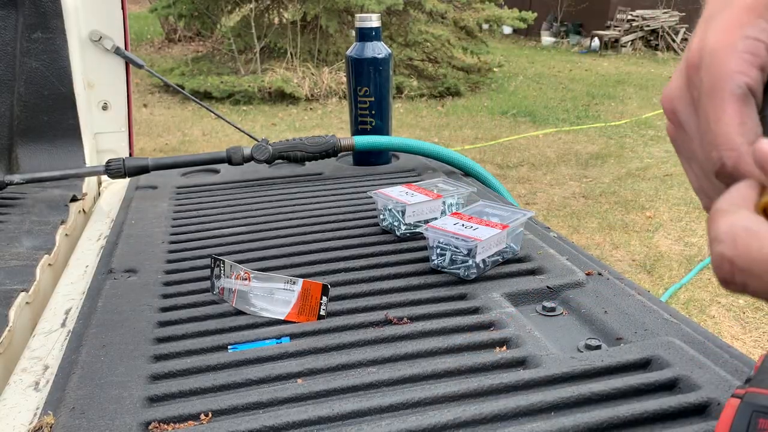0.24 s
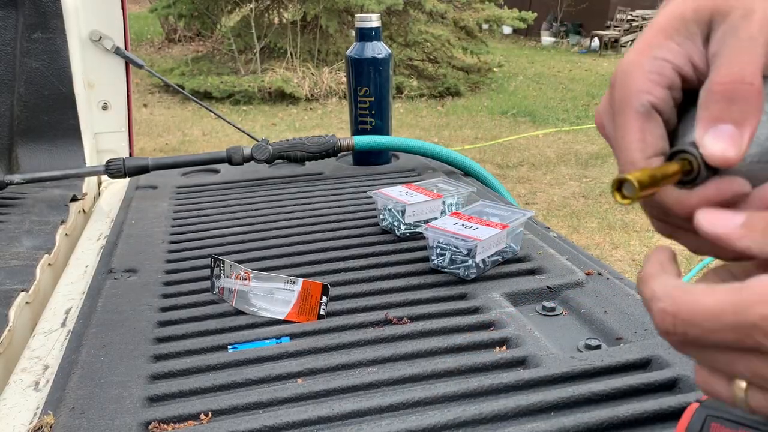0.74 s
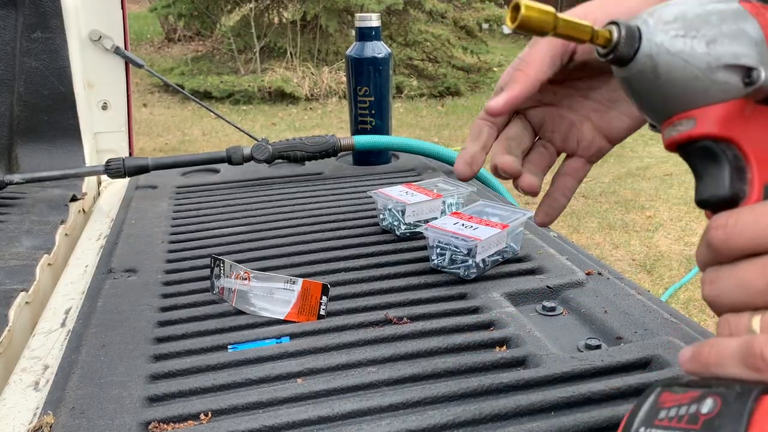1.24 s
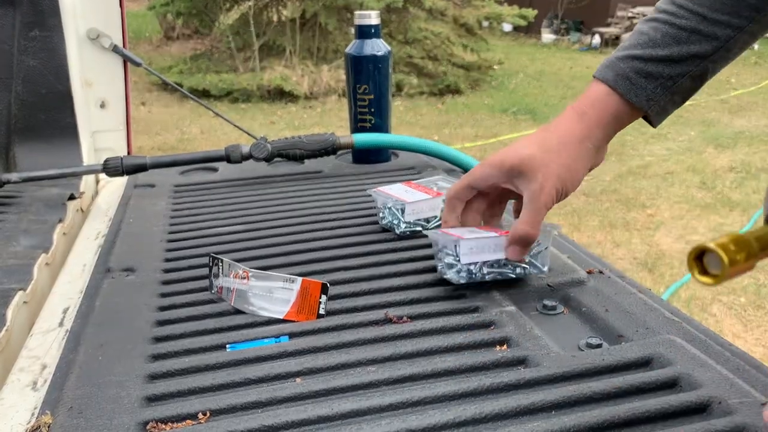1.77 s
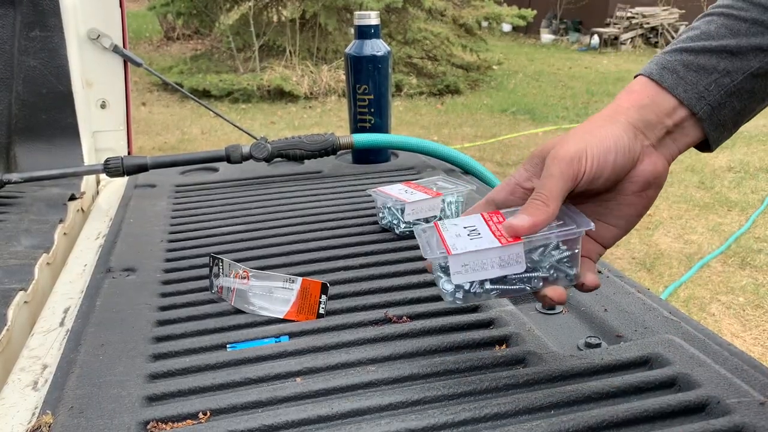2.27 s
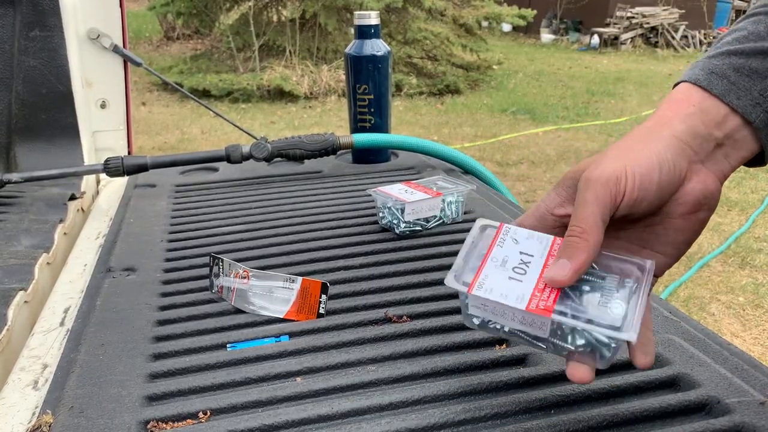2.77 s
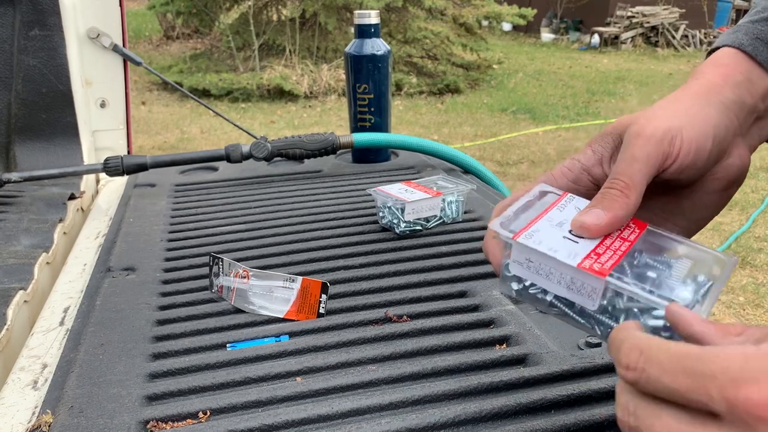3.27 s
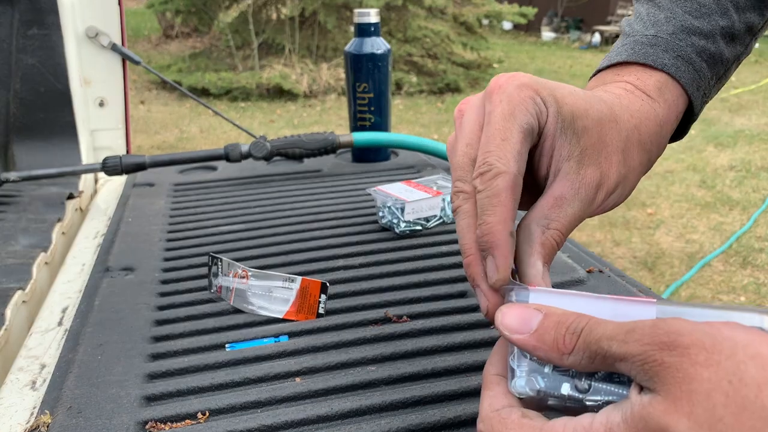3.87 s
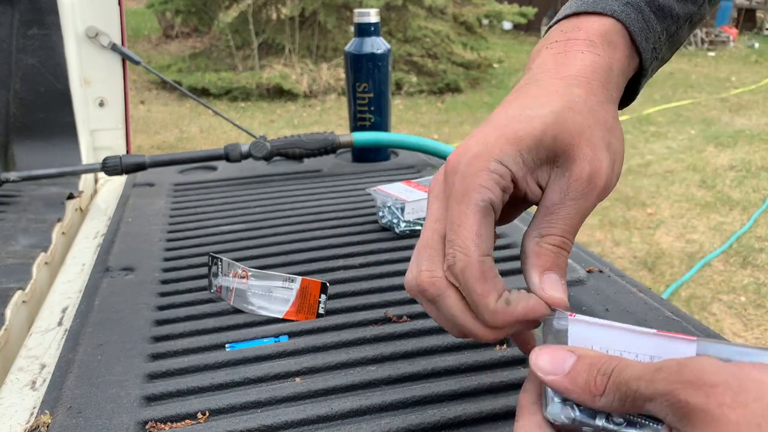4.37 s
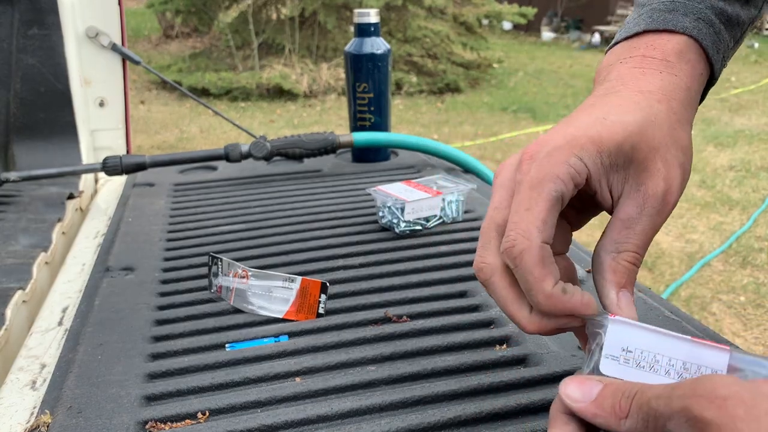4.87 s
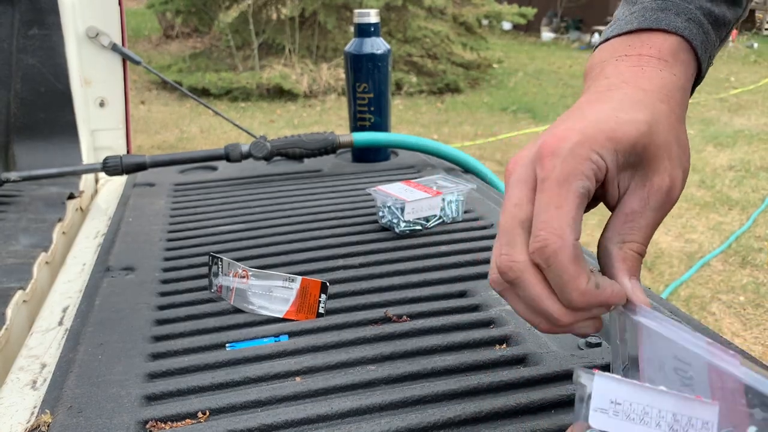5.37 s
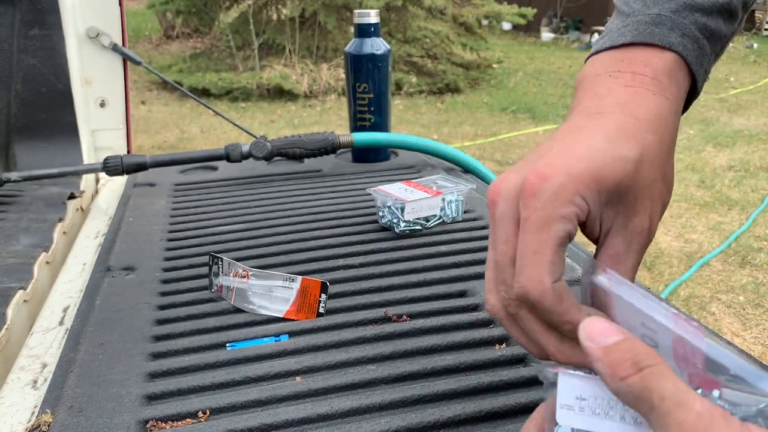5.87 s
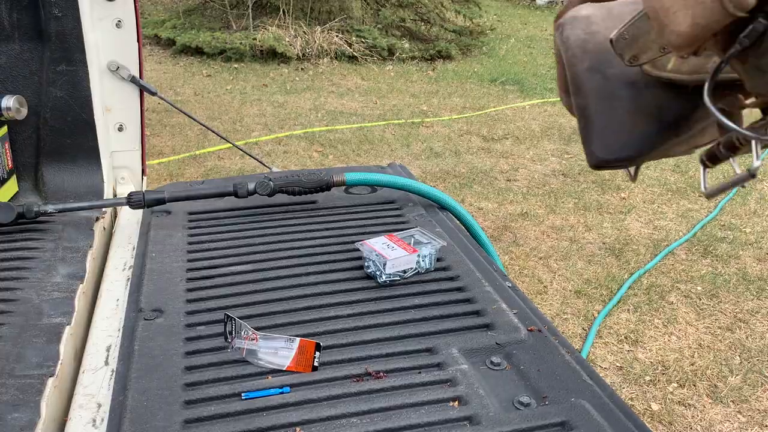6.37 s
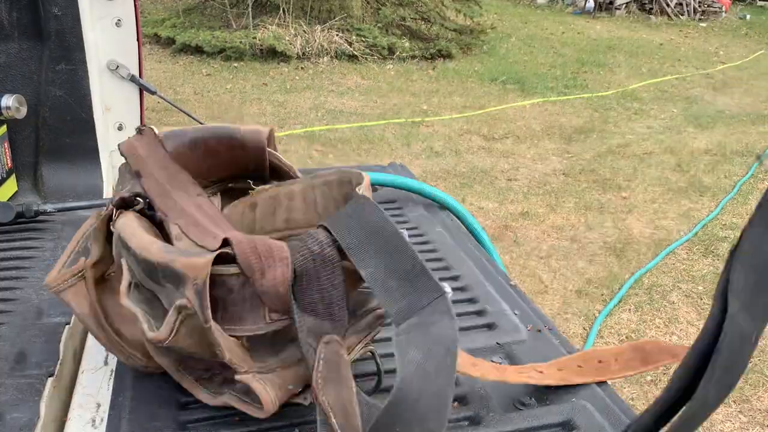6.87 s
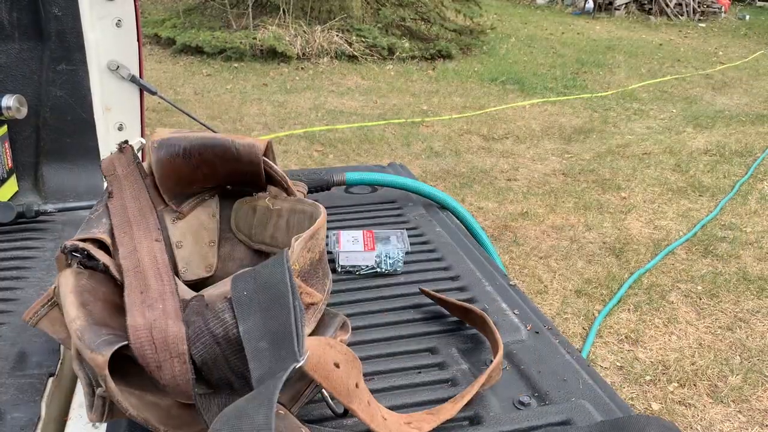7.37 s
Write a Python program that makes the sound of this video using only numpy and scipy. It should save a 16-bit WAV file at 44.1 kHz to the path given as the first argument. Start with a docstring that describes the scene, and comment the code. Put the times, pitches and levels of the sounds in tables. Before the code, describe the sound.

Close outdoor handling: sharp metallic clicks, a hollow knock, rattling screws, snapping plastic lid, and finally a heavy belt landing with clattering buckles.

```python
"""A bit clicks into a driver's chuck, close by, outdoors at a truck's tailgate. A plastic box of screws is then lifted,
tilted and picked open; last, a leather tool belt drops on the ribbed liner and its buckles jingle.
Blows are noise cracks with damped modes; buckles and collar are decaying sines, thumps are falling tones.
Sliding screws and leather are dense random contacts that also shake hollow bodies. Wind and far traffic are
shaped noise, rumbling below."""
import sys
import numpy as np
from scipy import signal
from scipy.fft import rfft, irfft, next_fast_len
from scipy.io import wavfile
from scipy.ndimage import uniform_filter1d

SR = 44100
rng = np.random.default_rng(int(sys.argv[2]) if len(sys.argv) > 2 else 0)


def digitize_waveform(pressure):
    """Quantize a signal to 16-bit integers and store it at the path in sys.argv[1].

    Rows of a 2-D input are taken as channels; values are limited to [-1, 1].
    """
    field = np.atleast_2d(pressure).T
    bounded = np.clip(field, -1, 1)
    quanta = np.round(bounded * 32767).astype(np.int16)
    wavfile.write(sys.argv[1], SR, quanta)


def invert_db(x):
    """Field ratio 10**(x/20) for x, a level in decibels (scalar or array-like)."""
    u = np.asarray(x, float) / 20
    return 10 ** u


N = 335601
T = np.arange(N) / SR

# Rumble of wind and traffic, swelling where the tailgate booms: [t/s, mean level/dB]
RUMBLE_LEVEL = [(0, -45), (1.0, -46), (1.035, -52.5), (1.55, -48), (1.66, -28), (1.8, -40.5), (3.2, -50),
                (6.45, -55), (6.58, -35.5), (7.0, -37), (7.6, -64)]
# Spectral density of the rumble: [f/Hz, level/dB per Hz]
RUMBLE_COLOUR = [(20, -34.5), (66, -2.5), (160, -16), (200, -13), (260, -29.5), (1340, -44.5), (8000, -83),
                 (17600, -120)]
# Spectral density of grit and ticking screws: [f/Hz, level/dB per Hz]
GRIT_COLOUR = [(1300, -2.5), (2100, 1.5), (4000, -7.5), (7000, -17), (17000, -31)]

# Changing level of handling noise, with sudden drops: [t/s, grit level/dB, body level/dB]
HANDLING = [(0, -72.5, -66.5), (1.031, -74.5, -64), (1.07, -80.5, -71), (1.48, -72.5, -65.5),
            (1.9, -63.5, -60.5), (2.45, -58.5, -51), (3.2, -67, -63), (4.2, -62, -60), (4.5, -62.5, -58),
            (5.398, -47.5, -56), (5.6, -75, -57.5), (6.121, -52, -100.5), (6.168, -93.5, -68.5),
            (6.28, -56, -57.5), (7.0, -65.5, -50), (7.37, -108, -77.5), (7.61, -64, -79)]
# Knocks that shake loose parts, rising suddenly and then settling:
# [peak t/s, grit level/dB, treble over grit/dB, low body over grit/dB, time to fade by 20 dB/s]
JOLTS = [(0.444, -47, 1, 6.5, 0.1), (1.524, -44.5, -5, 8, 0.43), (1.638, -37.5, -2.5, 17, 0.0577),
         (3.426, -47.5, -0.5, -3.5, 0.2), (4.293, -40.5, 1.5, -14, 0.15), (4.549, -32, -2.5, -10, 0.09),
         (5.243, -27, -1, -11, 0.0371), (6.524, -45, -2.5, 15, 0.57), (6.571, -17.5, 1.5, 9.5, 0.1012),
         (7.064, -53.5, -17, 24, 0.05)]
# Screws or leather sliding, an even swell and fade:
# [peak t/s, grit level/dB, treble over grit/dB, low body over grit/dB, time to rise or fade by 20 dB/s]
SLIDES = [(0.09, -57.5, -16, -24, 0.13), (0.89, -62.5, 13.5, -15, 0.048), (0.99, -56, 8, -5, 0.07),
          (1.721, -39, -4.5, -3, 0.069), (2.106, -29, 0, -1, 0.096), (2.80, -54.5, 7.5, 0, 0.23),
          (2.978, -44, -5.5, -8.5, 0.13), (3.73, -55, 3, -6, 0.21), (4.183, -50, 5.5, -17, 0.064),
          (4.35, -57.5, -2, 20.5, 0.09), (5.49, -42.5, -1, -11, 0.075), (5.827, -37, -4, -17, 0.26),
          (6.436, -47.5, 8, -34, 0.11), (6.751, -48.5, 1, 13.5, 0.21), (6.916, -34, -2, 16, 0.12)]
# The lid tearing open in one crunch:
# [grit level at start/dB, at end/dB, treble over grit/dB, low body over grit/dB, high body over grit/dB]
LID_TEAR = (-23, -31, -4, -6, 2)
# Duration of the tear: [start t/s, end t/s]
LID_TEAR_S = (6.084, 6.14)
# While the box is held off the liner: [start t/s, end t/s]
IN_HAND_S = (2.8, 6.2)

# Dull thumps of hand, tool or box: [t/s, level/dB, start f/Hz, t60/s]
THUMPS = [(0.404, -26, 698, 0.084), (0.439, -24, 222.5, 0.1), (0.99, -23, 420, 0.055),
          (0.993, -24.5, 221, 0.087), (1.613, -11, 523, 0.074), (1.784, -30.5, 532, 0.37),
          (2.41, -30.5, 498, 0.24), (5.25, -22, 483, 0.076), (6.114, -22.5, 480, 0.067),
          (7.192, -30, 461, 0.38)]
# The chuck's collar springing shut: [t/s, level/dB, f/Hz, t60/s]
COLLAR = (.988, -11, 15300, .016)
# Buckle parts touching: [t/s, level of small parts/dB, level of large ring/dB]
JINGLE = [(6.382, -20, -39.5), (6.408, -19.5, -54), (6.429, -21.5, -46), (6.513, -17.5, -42),
          (6.6675, -32, -42.5), (6.706, -28, -48), (6.7218, -28.5, -32), (6.75, -23.5, -41.5),
          (6.781, -24.5, -40.5), (6.847, -25, -37.5), (6.9687, -31, -48.5)]

# Blows: [t/s, crack level/dB, treble over crack/dB, low ring over crack/dB, high ring over crack/dB]
# Bit entering the chuck
CHUCK_BLOWS = [(0.16, -32, -8, -17, -7), (0.314, -38.5, -17, -9, 8), (0.405, -42, 0, 4, 5),
               (0.4326, -24.5, -16, 2, -17.5), (0.4526, -7.5, 2.5, -22, -8), (0.579, -48, -5, -15, -3),
               (0.6698, -44.5, -7, -7, 3), (0.9867, -19.5, 6, -3, -1.5)]
# Box knocking the liner as it is lifted, same columns
LIFT_BLOWS = [(1.517, -19, -8.5, -8, 4.5), (1.6096, -21, -4, 16, 8.5), (1.6205, -20, -23, 16.5, -13),
              (1.7112, -21.5, -21, -28, 5), (1.7839, -44, -8, 25.5, 18), (1.9236, -26, -11, 7, 6),
              (2.0804, -15, -0.5, -30, -9), (2.12, -25.5, -5, -13, -9), (2.2777, -36.5, -3, 6, 7),
              (2.4125, -56.5, -31, 29.5, 19), (2.655, -39.5, -18, -12, 5), (2.7376, -30, -6.5, 1, 6)]
# Box handled and its lid picked open, same columns
BOX_BLOWS = [(3.4171, -28.5, 6.5, -1, -35), (3.7383, -22.5, -3.5, -20, -15), (3.9664, -10.5, 7.5, -15, -48),
             (4.1515, -33.5, 7.5, -33, -20), (4.2879, -4, 3.5, -19.5, -10.5), (4.3841, -9, 1, -0.5, -2.5),
             (4.4348, -13.5, -9, -11, -8), (4.5284, -27.5, -1.5, 3, 4.5), (4.5602, -13.5, 8.5, -15, -15),
             (4.6542, -8.5, -2, -17, -20), (4.7147, -31, -1, -6, -6), (4.794, -27, -1, -4, -4),
             (4.8913, -24.5, -10, -2, -6.5), (4.9587, -17.5, -1, -6.5, -10.5), (5.0078, -28.5, 6, -3.5, -3),
             (5.051, -33.5, -8, -4, -7), (5.0935, -12, 11, -15, -44), (5.1427, -30, 2.5, 0, -4),
             (5.1811, -21.5, -1, -8, -10), (5.1918, -22.5, 13.5, -15, -16), (5.2123, -20.5, 5, -28, -30.5),
             (5.226, -11, 12.5, -18, -3.5), (5.2375, -15.5, 3.5, -25.5, -18.5), (5.2475, -3, 3, -20, -5),
             (5.3519, -28, -4.5, 6.5, 1), (5.3904, -20.5, 11, -37, -2), (5.654, -34, 14.5, -9, 0.5),
             (5.708, -35, 9, -17, 7), (5.739, -35.5, 8, -6, 9.5), (5.8242, -4, -11.5, -39, -16),
             (5.9512, -20, 10, -30, -5.5), (6.0376, -31.5, 11.5, -13, -0.5), (6.0834, -5, 3.5, -41, -2.5),
             (6.1011, -11, 9, -19.5, 0.5), (6.112, -2.5, 4.5, -13.5, -0.5)]
# Tool belt landing, same columns
BELT_BLOWS = [(6.5033, -32, -4, 22.4, 8), (6.5434, -6, -11, 4.8, 7.5), (6.7057, -22.5, -3.5, 13.2, 8),
              (6.7771, -24.5, 1, 12.7, 14.5), (6.8269, -25, -3.5, 12, 12.5), (6.8488, -16.5, -1.5, 10, 7.5),
              (6.8952, -3.5, -7.5, 5.4, 1), (6.936, -28.5, -39, 24, 11), (6.9854, -38, -5.5, 25.4, 18),
              (7.055, -24, -10.5, 11.9, 8.5), (7.163, -35.5, -9.5, 11, 7.5), (7.22, -50, -48.5, 32, 21),
              (7.3103, -60.5, -49, 37, 22.5)]
# Faint single clicks, mostly of screws and box, one as the belt settles: [t/s, crack level/dB]
CLICKS = [(2.5138, -41), (2.574, -50), (2.6236, -43), (2.6783, -40), (2.7741, -42), (2.9282, -35),
          (2.9603, -41), (2.976, -38), (3.001, -37), (3.0443, -43), (4.4544, -34), (4.651, -23),
          (4.76, -38.5), (4.8638, -34.5), (4.999, -30), (5.2903, -28), (5.4985, -29), (5.7954, -39),
          (5.9606, -28.5), (7.192, -41.5)]
# Balance shared by all clicks: [treble over crack/dB, low ring over crack/dB, high ring over crack/dB]
CLICK_COLOUR = (-5.5, -16, 0.75)

# Nominal modes of each body, undamped by hands: [f/Hz, relative level/dB, t60/s]
CHUCK_MODES = [(198, -0.5, 0.0069), (341, -7, 0.022), (660, 2.5, 0.014), (1380, -1.5, 0.0044)]
# Hollow plastic box, same columns
BOX_MODES = [(271, -3.5, 0.0087), (358, -0.5, 0.058), (455, -1.5, 0.03), (698, 8, 0.014), (990, 6.5, 0.044),
             (1336, 2.5, 0.066), (1994, -2.5, 0.068), (3970, -2.5, .025)]
# Ribbed liner, same columns
LINER_MODES = [(134.6, -15, 0.2), (210, -6, 0.12), (304, 2, 0.042), (480, 7, 0.09), (538.2, 6.5, 0.061),
               (677.3, -1.5, 0.1), (959, -1.5, 0.05), (1095.6, -3.5, 0.044), (1400, -5, 0.04)]
# Faint clicks, same columns
CLICK_MODES = [(420, 0, .02), (1750, -0.44, 0.041), (2200, 2, .04), (2800, -2.7, 0.026)]
# Small steel buckle parts, same columns
BUCKLE_MODES = [(9300, -2, 0.035), (10060, 1.5, 0.07), (11450, -3, 0.1), (12370, -3, .14), (12900, 6, 0.06),
                (14300, -2, .07), (15600, -2, .05)]
# Larger steel ring, same columns
LARGE_RING = [(5036, 0, 0.089)]

# Fixed treble colouring with dips near 8.5 and 13.5 kHz: [f/Hz, level/dB]
TREBLE_COLOUR = [(7300, -0.5), (8500, -15.5), (9600, -5), (12500, -1), (13500, -20), (14400, -2.5),
                 (15400, 0), (16600, -22)]
# Phase lead of the left port over the right; negative means it lags: [f/Hz, phase/rad]
PORT_PHASE = [(0, 0), (4600, -.4), (16700, -13)]

RING_SPLIT_HZ, CRACK_SPLIT_HZ, TREBLE_HZ, TOP_HZ = 600, 3200, 7000, 16600


def band(x, lo_hz, hi_hz):
    """Band limitation: a steep band-pass keeps one frequency region."""
    return signal.sosfilt(signal.butter(3, [lo_hz, hi_hz], "band", fs=SR, output="sos"), x)


def colour(x, points):
    """Spectral shaping: weights follow (Hz, dB) points on a log frequency axis; rms 1."""
    hz, db = np.transpose(points)
    n = next_fast_len(N)
    bin_hz = np.arange(n // 2 + 1) * SR / n
    weight = invert_db(np.interp(np.log(bin_hz + 1), np.log(hz), db))
    y = irfft(rfft(x, n) * weight, n)[..., :N]
    return y / np.std(y)


def walk(rate):
    """Low-pass random process: smoothed noise changes about rate times a second; standard deviation 1."""
    k = int(SR / rate)
    y = uniform_filter1d(uniform_filter1d(rng.standard_normal(N), k), k)
    return y / np.std(y)


def sides(pan_db):
    """Level-difference stereophony: channel gains with the left pan_db above the right."""
    return invert_db(np.array([[pan_db], [-pan_db]]) / 2)


def add(out, s, x):
    """Superposition: mixes a short sound in at time s."""
    i = int(s * SR)
    out[:, i:i + x.shape[-1]] += x[:, :N - i]


def decay(t, t60):
    """Exponential damping: amplitude falls by 60 dB in t60 seconds."""
    return np.exp(-np.log(1000) * t / t60)


def split(modes):
    """Modal grouping: low and high modes of one body."""
    low = [m for m in modes if m[0] < RING_SPLIT_HZ]
    high = [m for m in modes if m[0] >= RING_SPLIT_HZ]
    return low, high


def outdoors():
    """Broadband noise: gusty rumble nearly alike at both ports, its bass and upper part swelling apart."""
    mid, side = rng.standard_normal((2, N))
    air = colour(mid + 0.3 * side * np.array([[1], [-1]]), RUMBLE_COLOUR)
    upper = band(air, 130, TOP_HZ)
    bass = air - upper
    gusty = bass * invert_db(2.5 * walk(12)) + upper * invert_db(3 * walk(4))
    return gusty * invert_db(np.interp(T, *np.transpose(RUMBLE_LEVEL)))


def grains(rate, spread_db, smear_s, alike):
    """Friction as random contacts: puffs of noise of very unequal size; alike is the port correlation."""
    size = (rng.random(N) < rate / SR) * invert_db(spread_db * rng.exponential(size=N))
    fade = np.exp(-1 / (smear_s * SR))
    # the small constant keeps a steady hiss between contacts
    puff = np.sqrt(signal.lfilter([1], [1, -fade], size ** 2) + 0.083)
    mid, side = rng.standard_normal((2, N)) * puff
    return mid + np.sqrt((1 - alike) / (1 + alike)) * side * np.array([[1], [-1]])


def ticks(rate, spread_db, sharp):
    """Impulsive excitation of resonators: touching screws tick on 18 pitches, each tick on one; sharp is Q."""
    out = np.zeros((2, N))
    for hz in np.geomspace(1400, 7000, num=18):
        hits = (rng.random(N) < rate / SR) * invert_db(spread_db * rng.standard_normal(N))
        place = rng.random(N)
        placed = hits * np.array([.5 + place, 1.5 - place])
        out += signal.lfilter(*signal.iirpeak(hz, sharp, fs=SR), placed) * np.sqrt(sharp / hz)
    return out


def hollow(shake, modes):
    """Forced resonance: shaking excites the broad resonances of a hollow body; rms 1."""
    y = sum(invert_db(db) * band(shake, 0.852 * hz, 1.134 * hz) / np.sqrt(hz) for hz, db, _ in modes)
    return y / np.std(y)


def tear():
    """Progressive fracture: power of the four rustle layers, abrupt at both ends and weakening between."""
    (start, end), (first_db, last_db, treble_db, low_db, high_db) = LID_TEAR_S, LID_TEAR
    db = np.interp(T, [start - .003, start, end, end + .008], [-90, first_db, last_db, -90])
    return invert_db(db + np.array([[0], [treble_db], [low_db], [high_db]])) ** 2


def activity():
    """Incoherent addition: powers of handling, jolts, slides and tear sum to grit, treble and body gains."""
    s, grit_db, body_db = np.transpose(HANDLING)
    grit_db, body_db = np.interp(T, s, grit_db), np.interp(T, s, body_db)
    treble_over_grit_db, high_over_low_db = -2, 1
    power = invert_db([grit_db, grit_db + treble_over_grit_db, body_db, body_db + high_over_low_db]) ** 2
    jolt_rise_s = 0.036  # time to rise by 20 dB
    swells = [row + (jolt_rise_s,) for row in JOLTS] + [row + row[-1:] for row in SLIDES]
    for s, db, treble_db, low_db, fade_s, rise_s in swells:
        near = slice(max(int((s - 3 * rise_s) * SR), 0), int((s + 3 * fade_s) * SR))
        late = T[near] - s
        shape = invert_db(db - 20 * np.maximum(late / fade_s, -late / rise_s)) ** 2
        high_db = 0.51 * low_db + 1  # the upper body follows the lower only in part
        power[:, near] += shape * invert_db([[0], [treble_db], [low_db], [high_db]]) ** 2
    return np.sqrt(power + tear())


def rustle():
    """Friction and forced vibration: sliding screws and creaking plastic shake the hollow box or liner."""
    grit = colour(grains(350, 3.2, 0.003, 0.1), GRIT_COLOUR)
    screws = colour(ticks(70, 6.0, 16.), GRIT_COLOUR)
    # the screws move in fits, each frequency band partly on its own
    stir, edges = walk(45), np.geomspace(1200, TREBLE_HZ, num=6)
    mids = np.zeros((2, N))
    for lo_hz, hi_hz in zip(edges, edges[1:]):
        mids += band(grit + 1.4 * screws, lo_hz, hi_hz) * invert_db(1.8 * stir + 1.6 * walk(30))
    # the treble is more alike at both ports
    top = band(grit + 1.5 * grit.mean(0), TREBLE_HZ, TOP_HZ) * invert_db(1.8 * stir)
    shake = grains(400, 1.3, .004, .8) * sides(2.2)
    held = (T > IN_HAND_S[0]) & (T < IN_HAND_S[1])
    low, high = (np.where(held, hollow(shake, box), hollow(shake, liner))
                 for box, liner in zip(split(BOX_MODES), split(LINER_MODES)))
    return sum(gain * x / np.std(x) for x, gain in zip((mids, top, low, high), activity()))


def thumps():
    """Soft heavy contact: one low damped tone whose pitch sags to a fraction of its start."""
    out, t = np.zeros((2, N)), np.arange(int(.4 * SR)) / SR
    end_share, glide_s = .3, .005
    for s, db, hz, t60 in THUMPS:
        pitch = hz * (end_share + (1 - end_share) * np.exp(-t / glide_s))
        swing = np.sin(2 * np.pi * np.cumsum(pitch) / SR) * decay(t, t60)
        add(out, s, swing * invert_db(db) * sides(1.8))
    return out


def ring(modes, t, chance, scatter_db, drift):
    """Modal superposition: damped sines scattered in strength and slightly in pitch; peak 1."""
    hz, db, t60 = np.array(modes, float).T[:, :, None]
    k = len(modes)
    detune, strength = chance[:k, None], chance[k:2 * k, None]
    phase = 2 * np.pi * hz * (1 + drift * detune) * t
    y = (invert_db(db + scatter_db * strength) * np.sin(phase) * decay(t, t60)).sum(0)
    return y / np.abs(y).max()


def buckles():
    """Modal ringing of steel: small parts and a larger ring sound thin high tones, roughened by chatter."""
    out, t = np.zeros((2, N)), np.arange(int(.3 * SR)) / SR
    for s, db, large_db in JINGLE:
        chatter = 1 + 3.5 * band(rng.standard_normal(len(t)), 40, 600)
        chance = rng.standard_normal(16)
        small = invert_db(db) * ring(BUCKLE_MODES, t, chance, 6., .004)
        large = invert_db(large_db) * ring(LARGE_RING, t, chance, 0, .003)
        add(out, s, (small + large) * chatter * sides(-1.5))
    return out


def collar():
    """Damped free vibration: one very high, short ping."""
    out, t = np.zeros((2, N)), np.arange(int(.05 * SR)) / SR
    s, db, hz, t60 = COLLAR
    add(out, s, np.sin(2 * np.pi * hz * t) * decay(t, t60) * invert_db(db) * sides(-3))
    return out


def blows(table, modes, crack_s, tail_s, tail_db, pan_db):
    """Impact: a noise crack with a duller rattling tail, and the struck body's low and high modal ringing."""
    out, lead_s, swell_s = np.zeros((2, N)), .008, 0.00066
    length_s = min(.25, .07 + max(m[2] for m in modes))
    since = np.arange(int(length_s * SR)) / SR - lead_s
    t = np.maximum(since, 0)
    # a faint noise swells for under a millisecond before the crack
    tail_shape = invert_db(tail_db) * np.exp(-t / tail_s + (since - t) / swell_s)
    low, high = split(modes)
    for s, db, treble_db, low_db, high_db in table:
        chance, noise = rng.standard_normal((2, 12)), rng.standard_normal((2, len(t)))
        snap = noise[0] * t / crack_s * np.exp(1 - t / crack_s)
        # part of the tail comes back from the truck's sides, unlike at the two ports
        tail = (noise[0] + .55 * noise[1] * np.array([[1], [-1]])) * tail_shape
        # a softer contact dulls the upper half of the crack along with the treble
        upper = band(snap + 2.41 * tail, CRACK_SPLIT_HZ, TREBLE_HZ)
        mids = band(snap + tail, 1100, CRACK_SPLIT_HZ) + invert_db(0.82 * treble_db - 7.0) * upper
        top = band(snap + 5.3 * tail, TREBLE_HZ, TOP_HZ)
        crack = mids / np.abs(mids).max() + invert_db(treble_db) * top / np.abs(top).max()
        rough = 1 + 5 * band(noise[1], 20, 140)  # slow random wavering makes every ring uneven
        low_ring = rough * ring(low, t, chance[0], 3.7, 0.06) * (1 - np.exp(-t / 0.0014))
        # hands and leather damp the high ring
        high_ring = band(rough * ring(high, t, chance[1], 4.5, .06) * np.exp(-t / .014), 400, 5000)
        x = crack + invert_db(low_db) * low_ring + invert_db(high_db) * high_ring
        add(out, s - lead_s, x * invert_db(db) * sides(pan_db))
    return out


def weighted(modes, tilt_db):
    """Contact duration: a heavier, slower contact favours low modes; tilt in dB per octave."""
    return [(hz, db + tilt_db * np.log2(hz / RING_SPLIT_HZ), t60) for hz, db, t60 in modes]


def clicks():
    """Light impact: faint single clicks, mostly of screws and box, share one spectral balance."""
    table = [row + CLICK_COLOUR for row in CLICKS]
    return blows(table, CLICK_MODES, crack_s=.0004, tail_s=0.0044, tail_db=0, pan_db=0.36)


def chuck():
    """Hard impact: the bit strikes the chuck, whose short modes die quickly."""
    return blows(CHUCK_BLOWS, CHUCK_MODES, crack_s=0.00035, tail_s=0.0049, tail_db=0, pan_db=-0.79)


def box_lifted():
    """Slow impact: the box knocks the liner and favours its low modes."""
    modes = weighted(LINER_MODES, -8.0)
    return blows(LIFT_BLOWS, modes, crack_s=0.00088, tail_s=0.013, tail_db=0, pan_db=1.0)


def box_opened():
    """Brief impact: very short cracks with the hollow box's modes, as its lid is picked open."""
    return blows(BOX_BLOWS, BOX_MODES, crack_s=0.000071, tail_s=0.003, tail_db=0, pan_db=0.284)


def belt():
    """Distributed impact: the landing belt excites the liner, with a strong rattling tail."""
    return blows(BELT_BLOWS, LINER_MODES, crack_s=0.0004, tail_s=0.0087, tail_db=12, pan_db=3.6)


def scene():
    """Linear superposition of all sources, close and dry."""
    background = outdoors() + rustle() + thumps()
    metal = buckles() + collar()
    return background + metal + clicks() + chuck() + box_lifted() + box_opened() + belt()


def top_cut(x):
    """Nothing passes above the cut-off."""
    return signal.sosfilt(signal.butter(12, 17140, fs=SR, output="sos"), x)


def record(dry):
    """Linear filtering and saturation: the treble is coloured, the left port lags, loud peaks are rounded."""
    n = next_fast_len(N)
    hz = np.arange(n // 2 + 1) * SR / n
    turn = np.exp(.5j * np.interp(hz, *np.transpose(PORT_PHASE)))
    treble = invert_db(np.interp(hz, *np.transpose(TREBLE_COLOUR)))
    ports = irfft(rfft(dry, n) * treble * np.array([turn, turn.conj()]), n)[:, :N]
    low_pass = signal.ellip(8, .2, 70, TOP_HZ, fs=SR, output="sos")
    mix = signal.sosfilt(low_pass, np.tanh(ports))
    return top_cut(mix)


dry = scene()
out = record(dry)
digitize_waveform(out)
```